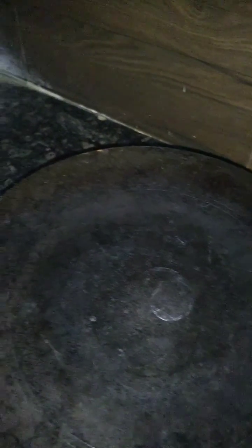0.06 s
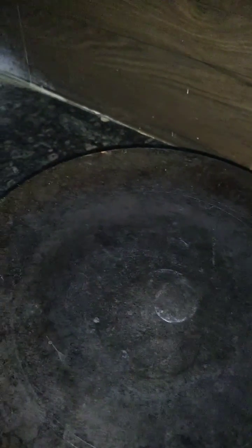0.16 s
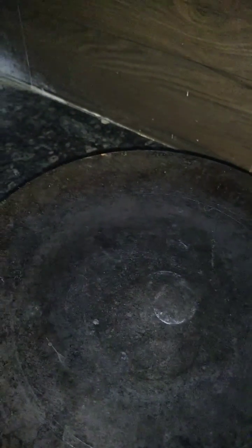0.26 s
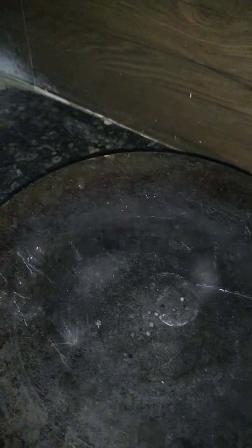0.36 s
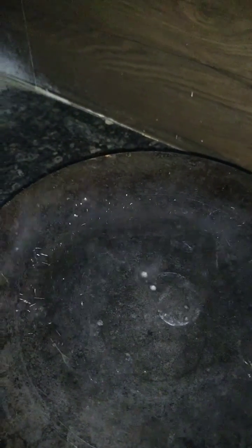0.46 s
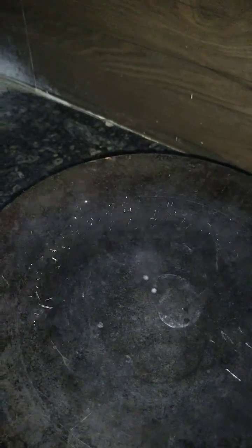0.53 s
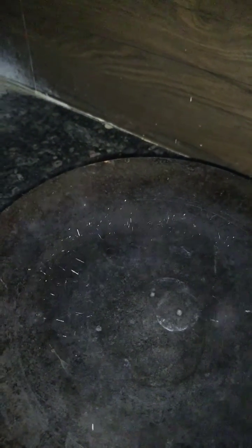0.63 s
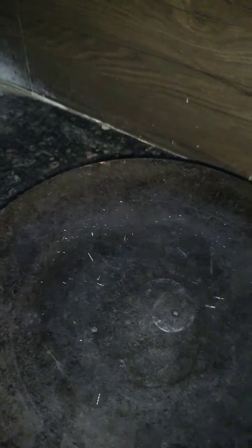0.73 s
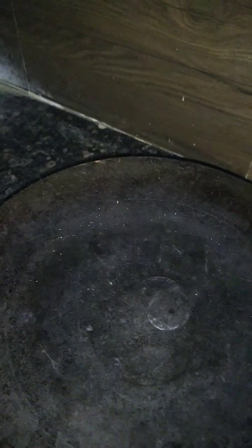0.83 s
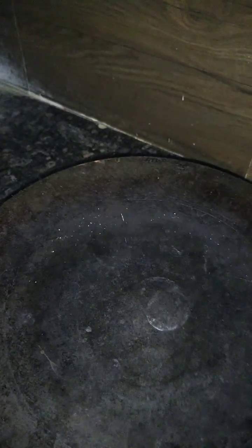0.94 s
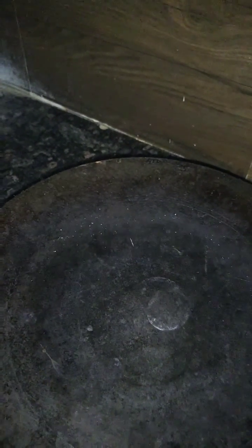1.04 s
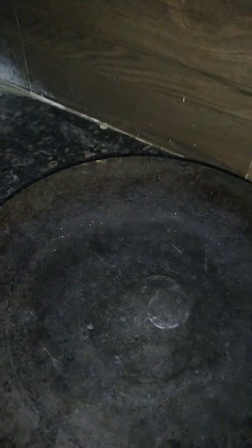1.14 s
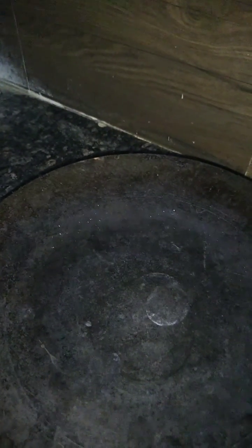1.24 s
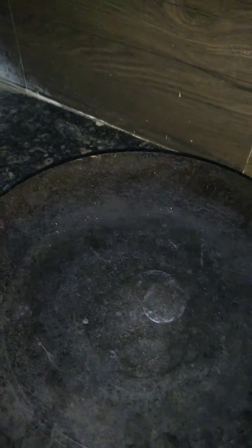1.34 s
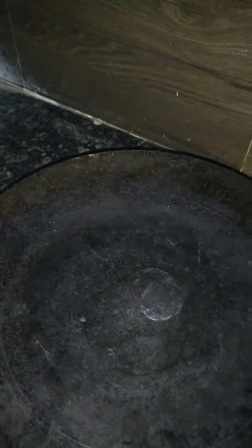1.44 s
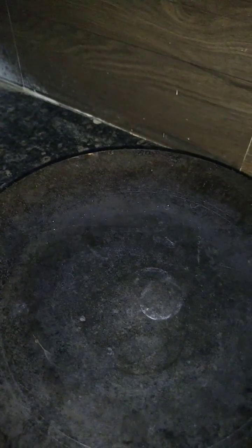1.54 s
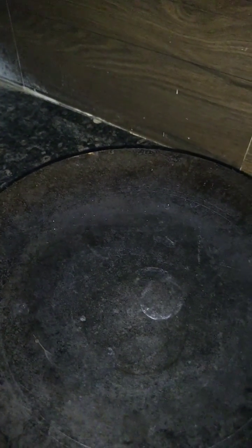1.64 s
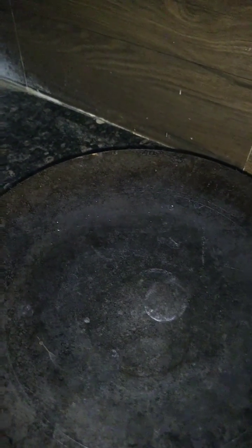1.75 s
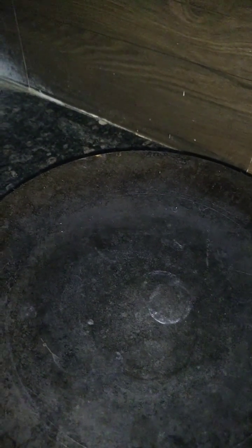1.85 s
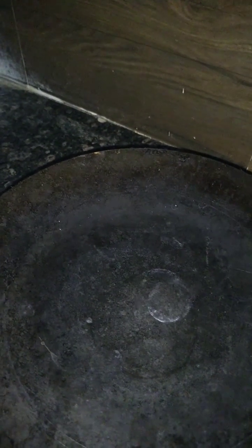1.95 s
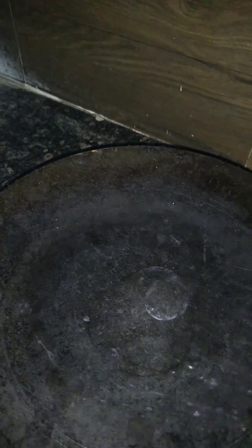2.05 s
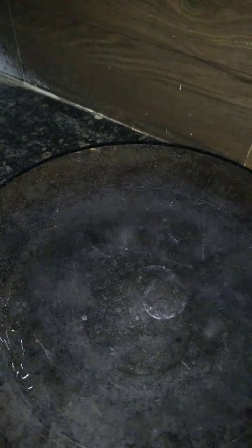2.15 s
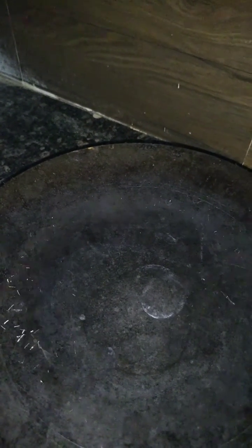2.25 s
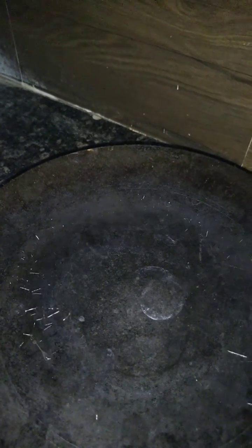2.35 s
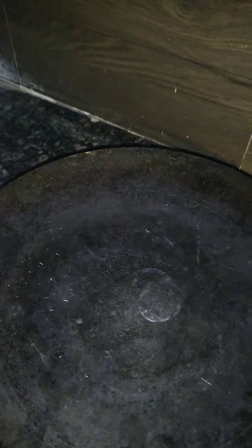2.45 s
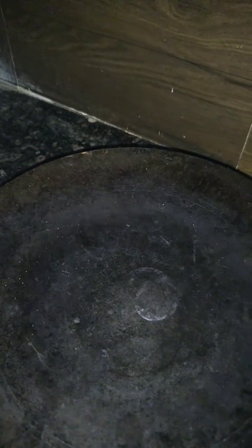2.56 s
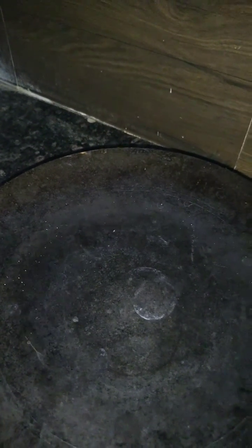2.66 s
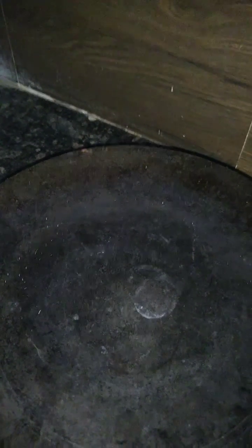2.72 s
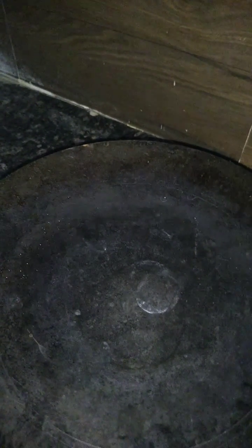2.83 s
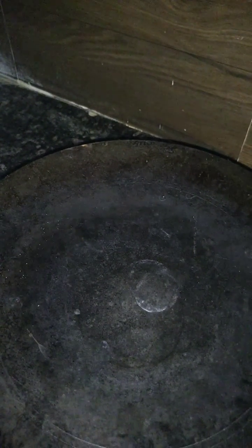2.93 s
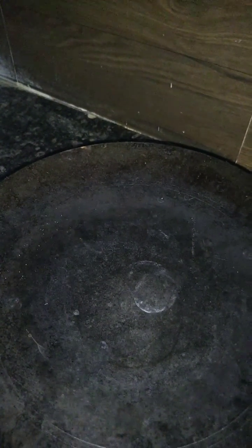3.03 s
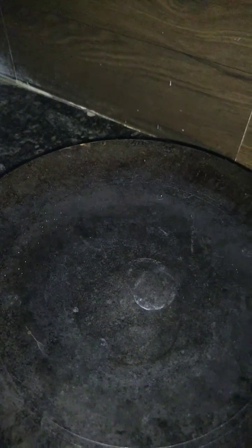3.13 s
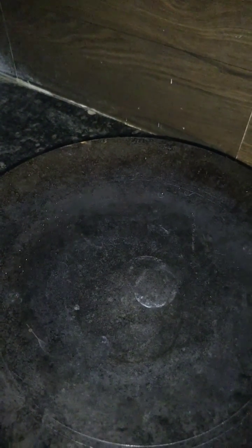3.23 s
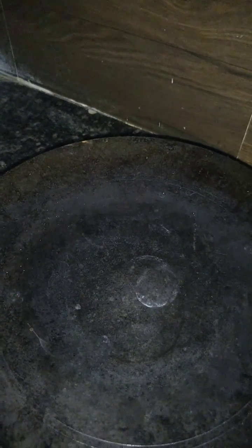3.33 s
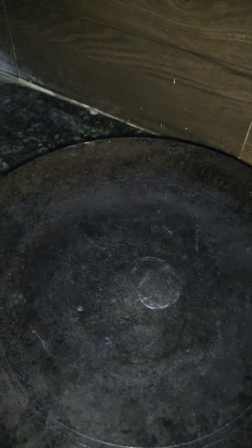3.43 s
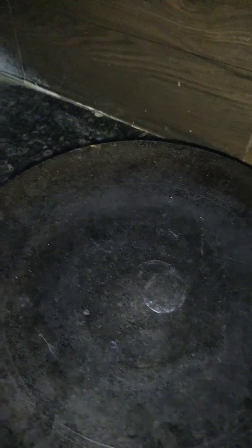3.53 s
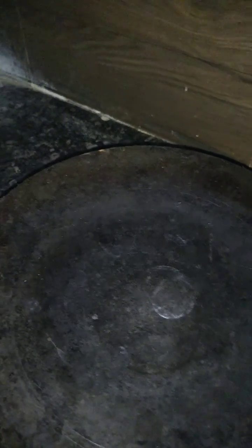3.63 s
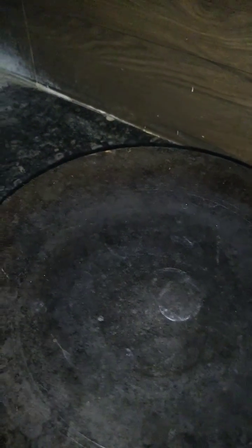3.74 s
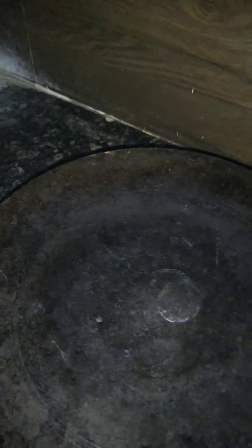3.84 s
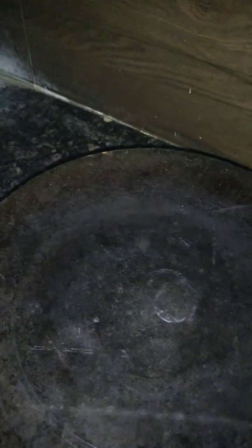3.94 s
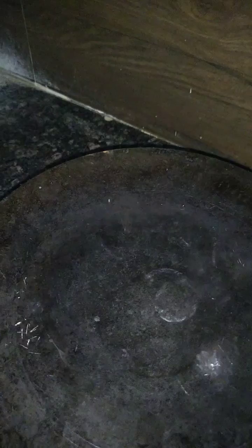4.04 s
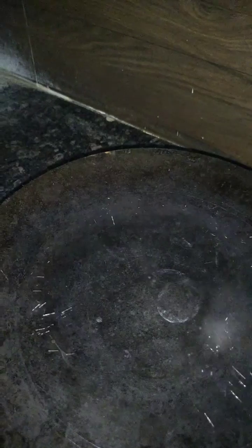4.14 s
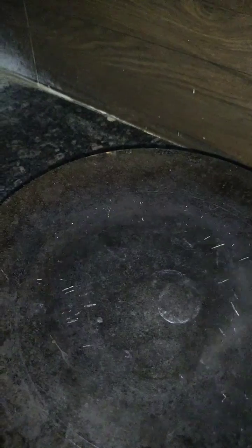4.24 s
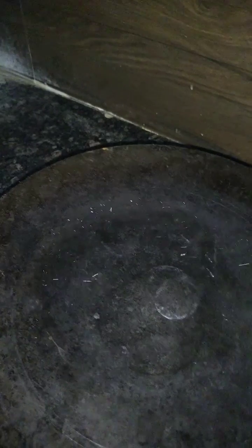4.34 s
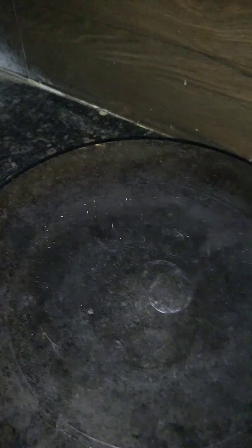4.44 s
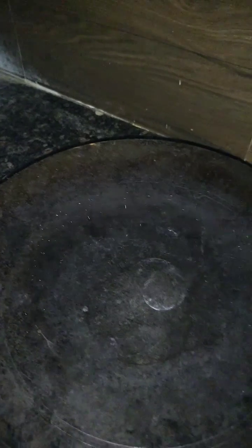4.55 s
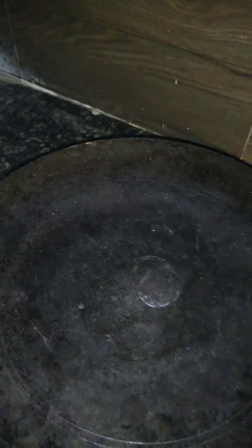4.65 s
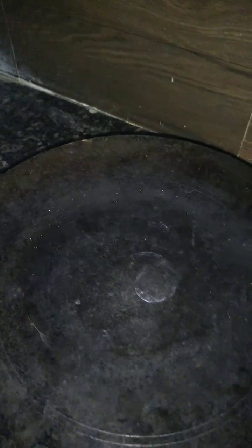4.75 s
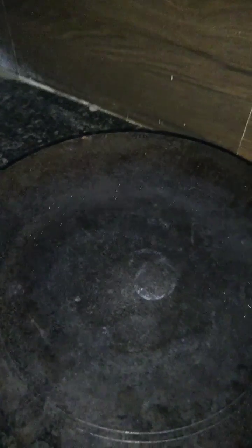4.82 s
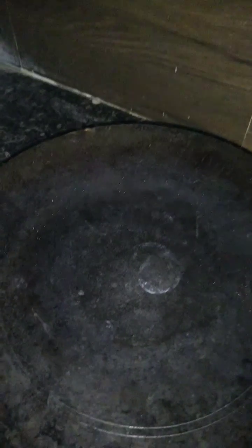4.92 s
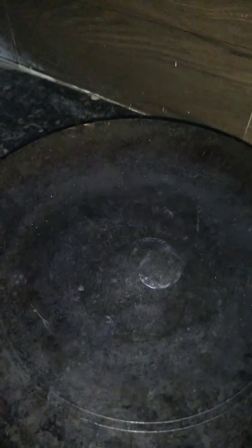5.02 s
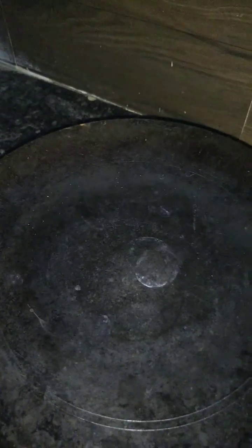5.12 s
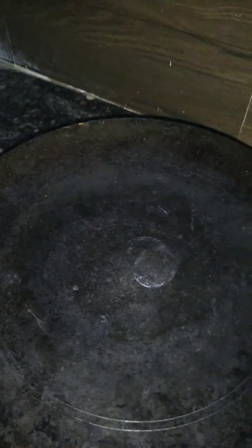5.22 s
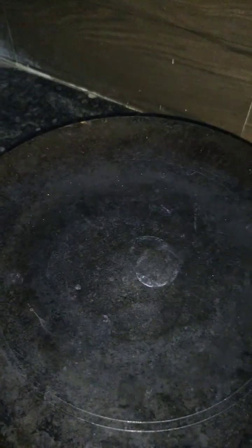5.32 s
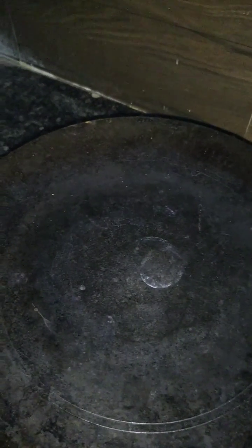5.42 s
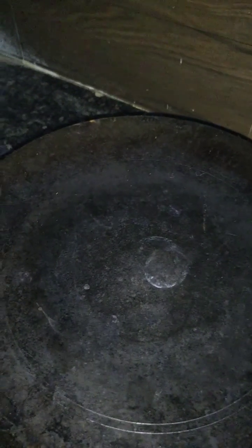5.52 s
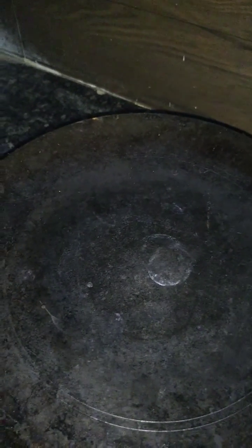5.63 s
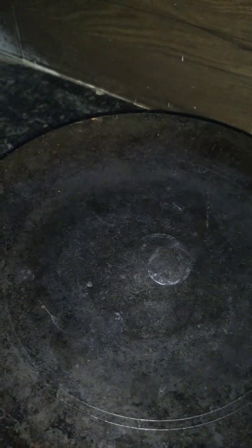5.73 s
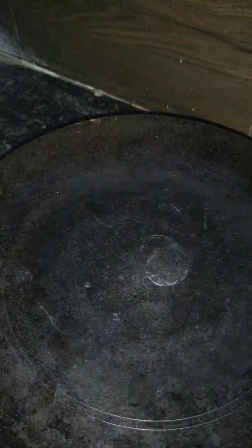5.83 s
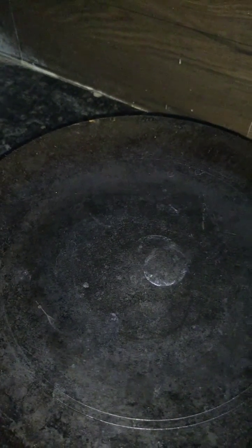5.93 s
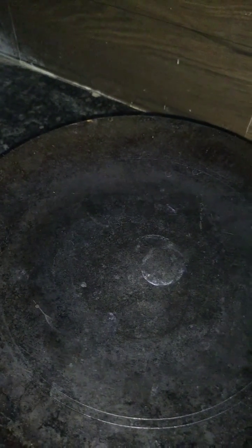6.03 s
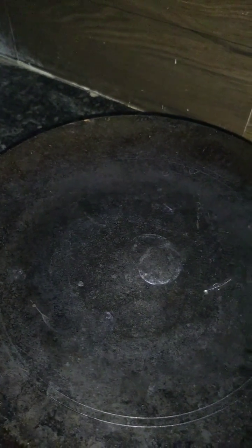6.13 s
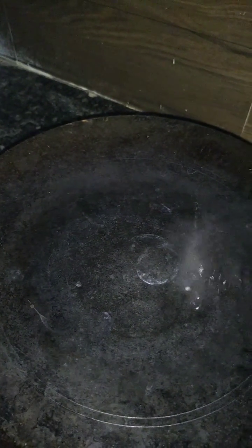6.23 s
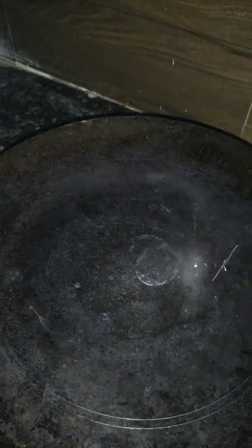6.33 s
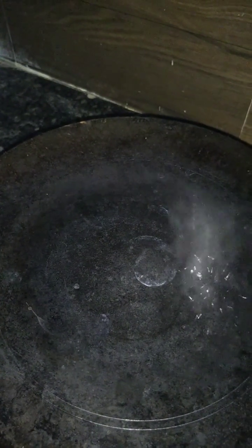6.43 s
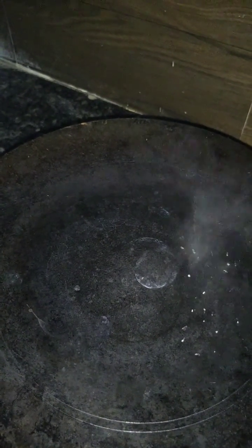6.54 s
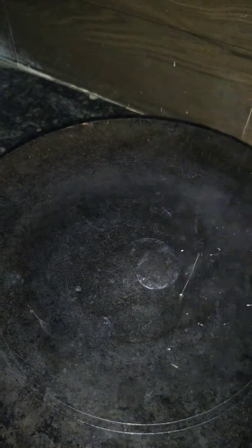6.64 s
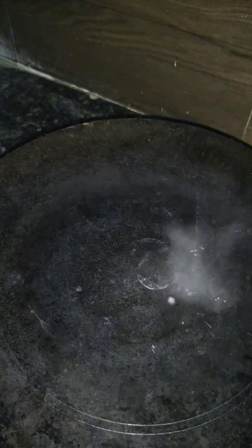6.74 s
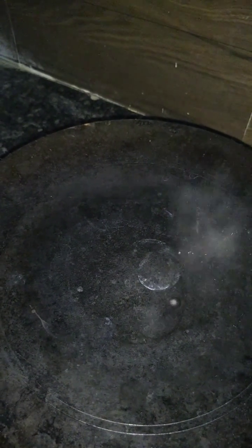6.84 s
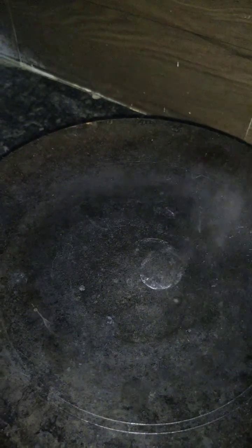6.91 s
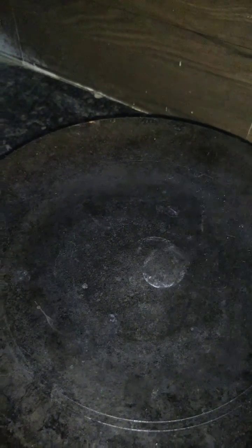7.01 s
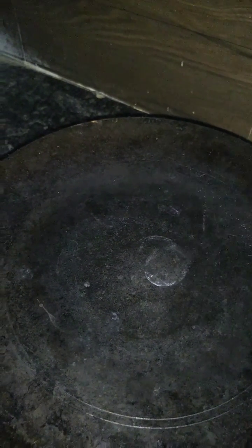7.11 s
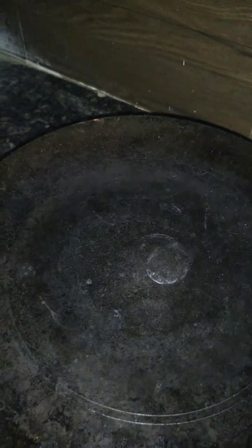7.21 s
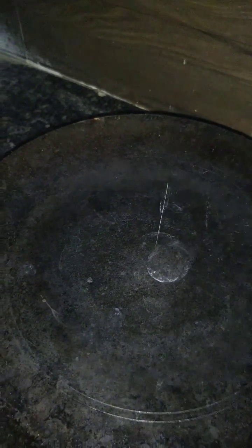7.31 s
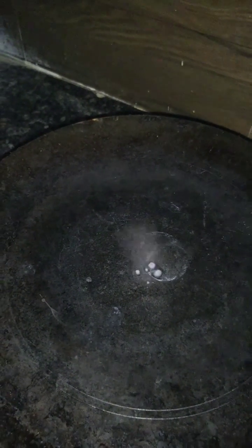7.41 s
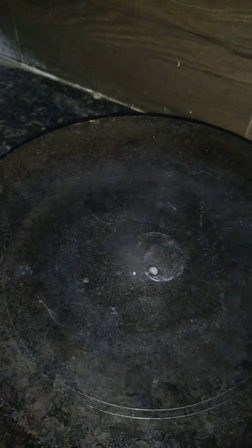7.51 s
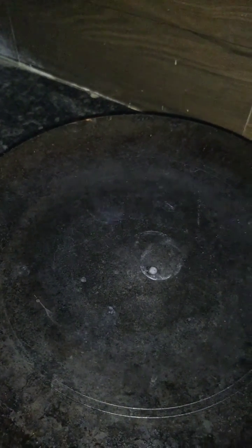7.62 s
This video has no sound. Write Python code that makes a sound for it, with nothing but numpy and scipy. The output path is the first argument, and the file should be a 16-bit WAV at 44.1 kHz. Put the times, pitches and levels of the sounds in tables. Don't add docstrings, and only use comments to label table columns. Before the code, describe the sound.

Close to a hot iron pan in a small kitchen, water droplets spit, then splashes land with a soft low thud and flare into sharp, bright hisses. Each breaks into crackling, skittering beads and dies within about a second. Between the four main sizzles, dull, nearly regular knocks on wood and low machine hum are heard. The fourth is punchier, with a metallic ring, and a faint last drop follows.

```python
import sys
import numpy as np
from scipy import signal
from scipy.fft import rfft, irfft, next_fast_len
from scipy.io import wavfile
from scipy.ndimage import uniform_filter1d, map_coordinates

SR = 44100
rng = np.random.default_rng(int(sys.argv[2]) if len(sys.argv) > 2 else 0)


def to_wav(sig):
    pcm = np.clip(np.atleast_2d(sig), -1, 1) * 32767
    pcm = np.round(pcm).astype(np.int16)
    wavfile.write(sys.argv[1], SR, pcm.T)


def boost(x):
    u = np.asarray(x, float) / 20
    return 10 ** u


N = 338247


def unit(x):
    return x / np.sqrt(np.mean(x ** 2) + 1e-20)


def along(points, hz):
    point_hz, value = np.transpose(points)
    return np.interp(np.log(hz + 1), np.log(point_hz + 1), value)


def filtered(x, response):
    size = next_fast_len(N + 8192, real=True)
    return irfft(rfft(x, size) * response(np.fft.rfftfreq(size, 1 / SR)), size)[:N]


def coloured(x, spectrum):
    return unit(filtered(x, lambda hz: boost(along(spectrum, hz))))


def modes(table):
    def response(f):
        total = 0
        for k, (hz, width_hz, db) in enumerate(table):
            damping = 1j * f * width_hz
            total = total + (-1) ** k * boost(db) * damping / (hz * hz - f * f + damping)
        return total
    return response


def wobble(rate_hz):
    coarse = np.arange(0, N + 64, 64)
    knots = rng.standard_normal(int(N * rate_hz / SR) + 400)
    return np.interp(np.arange(N), coarse, map_coordinates(knots, [coarse * rate_hz / SR]))


def mottled(depth_db, frame, bands, frames):
    z = signal.stft(rng.standard_normal(N), nperseg=frame)[2]
    field = uniform_filter1d(rng.standard_normal(z.shape), size=bands, axis=0)
    field = uniform_filter1d(field, size=frames, axis=1)
    return signal.istft(z * boost(depth_db * unit(field)), nperseg=frame)[1][:N]


def patchy(depth_db):
    return mottled(depth_db, frame=256, bands=4, frames=8)


def beads(depth_db):
    return unit(mottled(depth_db, frame=128, bands=6, frames=5))


def unsteady(hz, wander_hz, flutter_db, pace_hz):
    phase = 2 * np.pi * np.cumsum(hz + wander_hz * wobble(pace_hz)) / SR
    return unit(boost(2 * flutter_db * np.tanh(wobble(pace_hz) / 2 - .5)) * np.sin(phase))


GATE_SHUT_DB, GATE_SPAN_DB = -63, 23.5


def gate(hiss, lag_s):
    wish = np.clip((20 * np.log10(hiss) - GATE_SHUT_DB) / GATE_SPAN_DB, 0, 1)
    keep = np.exp(-1 / (lag_s * SR))
    return signal.lfilter([1 - keep], [1, -keep], wish)


# rest_db, gate_open_gain_db, load_share (dB per dB), compressor_gain_db
HUM_RULE = [(-81, 10, -0.1, 8.5), (-73.5, 7.5, -1.0, -1.5), (-72.5, 11, 0.95, -0.7), (-86, 13, 0.84, 5.5)]
# start_s, load_db
LOAD = [(0.0, -6.5), (0.35, -6.5), (0.6, -0.5), (1.05, -5.5), (1.47, -2.5), (2.05, 4.5), (2.35, -2),
        (2.78, 0), (3.27, -4), (4.08, 5), (4.5, 2), (5.15, 2), (5.4, 8.5), (5.88, 3.5), (6.45, -1),
        (7.05, 1), (7.3, 5), (7.67, 2)]
GATE_LAG_S = 0.092
COMPRESSOR_S, SPIN_UP_S = 5.74, 0.37
SURGE_S, SURGE_WIDTH_S, SURGE_DB = 2.82, 0.17, 5


def hum_levels_db(hiss):
    t = np.arange(N) / SR
    opened = gate(hiss, GATE_LAG_S)
    load_db = np.interp(t, *np.transpose(LOAD))
    running = np.clip((t - COMPRESSOR_S) / SPIN_UP_S, 0, 1)
    surge_db = SURGE_DB * np.exp(-((t - SURGE_S) / SURGE_WIDTH_S) ** 2)
    return [rest_db + open_db * opened + share * load_db + gain_db * running + surge_db
            for rest_db, open_db, share, gain_db in HUM_RULE]


# pitch_hz, wander_hz, flutter_db, pace_hz
HUM = [(75.4, .8, 1.5, 3), (135.5, 1.5, 3, 5), (168, 4, 4.5, 16), (338, 5, 3.5, 14)]


def hums(levels_db):
    return sum(boost(db + 4) * unsteady(*tone) for db, tone in zip(levels_db, HUM))


# pitch_hz, level_db (rms)
MAINS = (99.6, -70.5)


def mains(mean_db):
    hz, db = MAINS
    return boost(db + 0.28 * (mean_db + 73)) * unsteady(hz, 0.32, 1, 2)


# pitch_hz, level_db (per Hz)
RUMBLE = [(15, -48), (25, -12.5), (75, 1), (156, 3.5), (183, 8), (227, -21), (260, -13), (340, -46),
          (570, -120)]


def rumble(mean_db):
    return boost(mean_db + 9) * coloured(rng.standard_normal(N), RUMBLE)


# pitch_hz, level_db (per Hz)
AIR = [(130, -33.5), (220, -7), (245, -8), (337, -2), (657, -12.5), (932, -12.5), (1150, -19),
       (1610, -16.5), (1820, -14), (2120, -17), (2910, -20), (3720, -21), (7150, -27), (7830, -24.5),
       (8320, -47), (10800, -57), (18300, -120)]
AIR_DB, AIR_OPEN_DB, AIR_LAG_S = -70.5, 1.5, .6


def room_air(hiss):
    air = patchy(depth_db=0.5)
    ducts = [(1560, 110, -6.0), (1850, 31, -7.0), (2073, 100, 2), (3330, 93, -15.0), (4600, 63, -13.5)]
    whirr = filtered(air, modes(ducts))
    level_db = AIR_DB + AIR_OPEN_DB * gate(hiss, AIR_LAG_S) + 1.0 + 0.26 * wobble(1.6)
    return boost(level_db) * coloured(air + whirr, AIR)


# start_s, peak_db, t60_s, deep_db (re peak)
THUDS = [(0.014, -54, 0.3, -4.5), (0.443, -39, 0.33, -10.5), (0.47, -46, 0.32, -15),
         (2.169, -41, 0.28, -13), (2.188, -35.5, 0.22, -14.5), (2.329, -45, 0.31, -5),
         (4.065, -34.5, 0.29, -28), (4.097, -40, 0.28, -26), (4.159, -44, 0.32, -19), (5.86, -58, 0.33, -2),
         (6.276, -48, 0.32, -17), (6.483, -37, 0.25, -15), (6.54, -42, 0.19, -16), (6.777, -48.5, 0.2, -13)]


def thuds():
    push, t = np.zeros((2, N + SR)), np.arange(SR // 3) / SR
    for s, db, t60_s, deep_db in THUDS:
        level_db = db - 6.5 - 60 * t / t60_s + np.array([[0], [deep_db + 9.0]])
        push[:, round(s * SR):][:, :len(t)] += boost(level_db) * (1 - np.exp(-t / 0.0026))
    low = coloured(rng.standard_normal(N), [(50, -26.5), (90, -1.0), (190, 1.0), (240, -25.0), (500, -43.5)])
    deep = coloured(rng.standard_normal(N), [(20, -42.5), (45, -2.5), (75, 6.0), (110, -35.0)])
    return push[0, :N] * low + push[1, :N] * deep


# start_s, peak_db
KNOCKS = [(0.081, -57), (0.203, -56.5), (0.33, -53), (1.289, -63), (1.435, -58), (1.595, -53.5),
          (1.742, -55), (1.902, -54.5), (2.067, -55), (2.9, -50), (3.093, -53.5), (3.246, -54),
          (3.412, -54.5), (3.519, -60.5), (3.64, -52), (3.807, -57), (4.0, -55), (4.794, -52),
          (4.949, -56.5), (5.09, -58), (5.237, -55.5), (5.331, -53), (5.479, -54.5), (5.619, -53.5),
          (5.793, -54), (5.984, -54), (6.182, -54.5), (7.184, -50), (7.369, -55), (7.579, -52)]
MASKED_KNOCKS_S = [0.78, 0.864, 2.389, 2.505, 2.712, 4.482, 4.639, 6.393, 6.544, 6.984]
MASKED_KNOCK_DB = -48
# pitch_hz, width_hz, level_db
WOOD = [(330, 90, -7), (420, 60, 0), (580, 140, -5), (770, 140, -4), (1100, 250, -10), (1640, 250, -13),
        (2000, 300, -12)]


def knocks():
    blows, t = np.zeros(N + SR), np.arange(SR // 8) / SR
    wood = unit(filtered(rng.standard_normal(N), modes(WOOD)))
    for s, db in list(KNOCKS) + [(s, MASKED_KNOCK_DB) for s in MASKED_KNOCKS_S]:
        blows[round(s * SR):][:len(t)] += boost(db - 4.0 - 60 * t / 0.12) * (1 - np.exp(-t / 0.003))
    return blows[:N] * wood


# start_s, peak_db, pitch_hz
FORERUNNERS = [
    (0.3287, -66, 2600),
    (0.377, -40, 2370),
    (2.115, -46.5, 2470),
    (3.9783, -50, 2220),
    (7.36, -45, 4400),
    (7.446, -46, 3630),
]
# start_s, peak_db, pitch_hz
SPITS = [(1.229, -43.5, 2690), (1.3472, -51, 3640), (1.3776, -52, 3700), (1.4904, -47, 3580),
         (1.5133, -49, 5000), (1.563, -51, 5240), (1.5973, -52, 3540), (1.6865, -54, 2990),
         (2.7483, -38.5, 4100), (2.7876, -38.5, 3800), (2.96, -48, 2470), (3.0114, -53, 3650),
         (3.038, -50, 3270), (3.098, -56, 2570), (3.212, -38.5, 7200), (4.436, -30, 2500),
         (3.377, -54, 3630), (4.739, -41, 2600), (4.956, -51, 3670), (5.0, -48.5, 2590),
         (5.1034, -54, 4200), (5.218, -52.5, 5000), (5.3046, -54, 5000), (5.466, -61, 6000),
         (5.4882, -55, 5170), (5.799, -55, 7630), (5.8271, -57, 4350), (7.246, -49, 3520),
         (7.2972, -54, 4140), (7.33, -55, 3340)]
# start_s, peak_db
STRAYS = [(1.4364, -58), (1.459, -63), (1.508, -60), (3.2009, -55), (3.286, -56), (3.4645, -62),
          (3.6734, -60), (5.0164, -59), (5.1371, -60), (5.1976, -61), (5.385, -60), (5.395, -60),
          (5.5027, -54), (6.0293, -59), (7.4199, -63)]
FORERUNNER_T60_S, SPIT_T60_S, STRAY_T60_S, STRAY_HZ = 0.027, 0.022, 0.012, 4200


def spits():
    out, t = np.zeros(N + SR), np.arange(SR // 8) / SR
    f = np.fft.rfftfreq(len(t), 1 / SR)
    highpass = (f / 1800) ** 2 / (1 + (f / 1800) ** 2)
    treble_cut = boost(-9 * np.clip((f - 7300) / 700, 0, 1))
    events = [(*row, FORERUNNER_T60_S) for row in FORERUNNERS]
    events += [(*row, SPIT_T60_S) for row in SPITS]
    events += [(*row, STRAY_HZ, STRAY_T60_S) for row in STRAYS]
    for s, db, hz, t60_s in events:
        broad = boost(-2.5) * highpass * np.minimum(1, hz / (f + 1)) ** .5
        peak = np.exp(-(np.log(f / hz + 1e-3) / 0.16) ** 2)
        noise = irfft(rfft(rng.standard_normal(len(t))) * treble_cut * (broad + peak), len(t))
        crack = boost(-60 * t / t60_s) * (1 - np.exp(-t / 0.00033)) * noise
        out[round((s - .0005) * SR):][:len(t)] += boost(db + 1.5) * crack / np.abs(crack).max()
    return out[:N]


# start_s, hiss_db, rise_s, hold_s, fall_db_per_s
DROPS = [(0.419, -36.5, .053, 0.0022, 128), (0.491, -34, 0.064, .002, 67.5),
         (0.653, -39.5, 0.053, .002, 66), (0.864, -41.5, 0.029, 0.0023, 131.5),
         (0.951, -44.5, .011, .002, 68), (2.165, -39, 0.014, 0.06, 58), (2.174, -39.5, 0.079, 0.16, 138.5),
         (2.504, -39.5, 0.048, 0.0022, 258.5), (2.558, -49.5, 0.016, 0.12, 278),
         (2.733, -53, .014, 0.14, 302.5), (2.916, -64.5, 0.033, .002, 61), (4.057, -39, 0.011, .075, 153),
         (4.143, -36.5, 0.011, 0.25, 303), (4.411, -39.5, 0.023, 0.051, 59.5),
         (4.476, -42.5, .012, .002, 200), (4.861, -49.5, .012, .002, 479.5),
         (6.269, -36.5, .013, .002, 173), (6.285, -41.5, 0.039, .17, 203), (6.475, -30, 0.013, .002, 260),
         (6.49, -37.5, 0.039, 0.095, 99.5), (6.691, -39, 0.053, .002, 263.5),
         (6.78, -31, 0.01, 0.024, 125.5), (6.847, -40, 0.055, .075, 104), (7.463, -47, 0.0097, 0.28, 50)]
SAG_DB_PER_S, FILM_DB, DRYING_DB_PER_S = 10, -71, -44


def boiling():
    t, power = np.arange(N) / SR, np.full(N, 1e-14)
    for s, db, rise_s, hold_s, fall_db_per_s in DROPS:
        end_db = db - SAG_DB_PER_S * hold_s
        fall_s = max(end_db - FILM_DB, .1) / fall_db_per_s
        corners_s = np.cumsum([s + rise_s, hold_s, fall_s, 1])
        on = slice(round(s * SR), round(corners_s[-1] * SR))
        shape_db = np.interp(t[on], corners_s, [db, end_db, FILM_DB, FILM_DB + DRYING_DB_PER_S])
        power[on] += (np.clip((t[on] - s) / rise_s, 0, 1) * boost(shape_db)) ** 2
    return np.sqrt(power)


# pitch_hz, level_db (per Hz)
LINGER = [(1200, -29.5), (2200, 0), (3500, -1.5), (5200, -11.5), (8000, -29.5), (12000, -120)]
LINGER_DB = -70


def lingering_air(hiss):
    return boost(LINGER_DB) * gate(hiss, lag_s=1.0) * coloured(beads(depth_db=2.5), LINGER)


# start_s, puff_db
FLASHES = [
    (0.435, -45),
    (0.465, -48),
    (2.166, -45),
    (2.189, -50),
    (4.057, -45),
    (6.481, -51),
    (6.78, -50),
    (7.466, -66),
]
FLASH_T60_S = 0.33


def flashes():
    out, t = np.zeros(N + SR), np.arange(SR // 2) / SR
    for s, db in FLASHES:
        out[round(s * SR):][:len(t)] += np.clip(t / 0.0067, 0, 1) * boost(db - 60 * t / FLASH_T60_S)
    return out[:N]


# pitch_hz, level_db (per Hz)
PUFF = [(120, -32), (200, -8.5), (238, -4.5), (474, 3.5), (771, -6), (1060, -18), (1200, -17),
        (1560, -46.5), (2640, -120)]
PUFF_DB, PUFF_FOLLOWS = -55, 0.56


def puffs(hiss):
    strength = boost(PUFF_DB) * (hiss / boost(-39.5)) ** PUFF_FOLLOWS * np.clip(hiss / boost(-66), 0, 1)
    rush = coloured(patchy(depth_db=1.0) * boost(2.2 * wobble(30)), PUFF)
    return boost(-3.0) * (strength + flashes()) * rush


def bursts(per_second, spread_db, life_s):
    draw = rng.random((2, N))
    starts = (draw[0] < per_second / SR) * boost(-2 * spread_db * np.log(draw[1] + .03))
    return signal.lfilter([1], [1, -np.exp(-1 / (life_s * SR))], starts)


# pitch_hz, width_hz, level_db
PAN = [(2148, 14, -6), (2466, 130, 9), (3750, 380, -3.5), (6490, 120, -0.5)]


def chopped(hiss):
    thin = np.clip((-42 - 20 * np.log10(hiss + 1e-6)) / 22, 0, 1)
    dense = unit(np.sqrt(bursts(1200, spread_db=-1.5, life_s=.0007) + .5))
    sparse = unit(np.sqrt(bursts(130, spread_db=1.5, life_s=0.0032) + 0.39))
    chop = dense * (1 - 0.74 * thin + 0.87 * thin * sparse) * boost(0.46 * wobble(25))
    film = np.sqrt(1 - 0.7 * thin) * unit(patchy(depth_db=1.5))
    broken = np.sqrt(0.83 * thin) * beads(depth_db=5.5)
    raw = (film + broken) * chop
    return raw + boost(-2) * filtered(raw, modes(PAN))


# pitch_hz, level_db (per Hz)
HISS = [(590, -28), (1000, -13), (1260, -16.5), (1480, -6.5), (1870, -6.5), (2120, 0.5), (2430, 0),
        (2800, -1), (3790, -2), (4380, -3), (5600, -12.5), (7280, -57), (12300, -120)]
FIZZ = [(2820, -29), (4800, -7.5), (5650, -3), (6460, 3.5), (7310, 2), (7800, -3), (8320, -9.5),
        (10800, -54.5), (18300, -120)]
# start_s, level_db
SPLASH_FIZZ = [
    (0.4, 0),
    (2.1, 2),
    (4.0, 1.5),
    (6.2, -1.5),
    (6.65, 0),
    (7.4, -1),
]
FIZZ_DB, FIZZ_FOLLOWS = -45.5, 0.93


def sizzle(hiss):
    start_s, splash_db = np.transpose(SPLASH_FIZZ)
    splash = np.maximum(np.searchsorted(start_s, np.arange(N) / SR) - 1, 0)
    fizz_db = FIZZ_DB + splash_db[splash] + 0.85 * wobble(12)
    fizz = boost(fizz_db) * (hiss / boost(-40)) ** FIZZ_FOLLOWS
    ringing = chopped(hiss)
    return hiss * coloured(ringing, HISS) + puffs(hiss) + fizz * coloured(ringing, FIZZ)


# start_s, level_db, pitch_hz, t60_s
RINGS = [
    (6.272, -37, 5250, 0.13),
    (6.272, -39.5, 2550, .2),
    (6.36, -45.5, 2500, 1),
    (6.52, -42.5, 2480, .6),
    (6.79, -39, 2490, 0.47),
    (6.272, -38.5, 6500, 0.1),
    (6.481, -31, 6500, 0.087),
    (2.53, -36.5, 2430, 0.17),
]


def rings():
    out, t = np.zeros(N + SR), np.arange(SR // 4) / SR
    for s, db, hz, t60_s in RINGS:
        mode = unit(signal.lfilter(*signal.iirpeak(hz, hz / 170, SR), rng.standard_normal(len(t))))
        out[round(s * SR):][:len(t)] += boost(db - 60 * t / t60_s) * np.clip(t / 0.0071, 0, 1) * mode
    return out[:N]


# pitch_hz, t60_s
KITCHEN = [(300, 0.33), (2000, 0.27), (8000, 0.23)]


def kitchen(x):
    hz, t, z = signal.stft(rng.standard_normal(SR // 2), SR, nperseg=256)
    decay = boost(-60 * t / along(KITCHEN, hz)[:, None])
    tail = signal.istft(z * decay, SR, nperseg=256)[1]
    return signal.fftconvolve(np.pad(x, (200, 0)), tail / np.linalg.norm(tail))[:N]


def scene():
    hiss = boiling()
    levels_db = hum_levels_db(hiss)
    mean_db = np.mean(levels_db, axis=0)
    background = hums(levels_db) + mains(mean_db) + rumble(mean_db) + room_air(hiss) + lingering_air(hiss)
    far = knocks()
    pan = spits() + sizzle(hiss) + rings()
    room = kitchen(boost(-10.5) * pan + boost(-8.5) * far)
    return (background + thuds() + far + pan + room)[None]


def band_limit(x):
    return signal.sosfilt(signal.butter(12, 8470, fs=SR, output="sos"), x)


def record(dry):
    soft = dry[0] / (1 + np.abs(dry[0] / .11) ** 3) ** (1 / 3)
    rolloff = [(22, -16), (45, -1), (7600, -1), (8100, -15.5), (8400, -15.0), (8520, -68.5)]  # pitch_hz, level_db
    kept = filtered(soft, lambda hz: boost(along(rolloff, hz)))
    return band_limit(kept[None])


dry = scene()
out = record(dry)
to_wav(out)
```